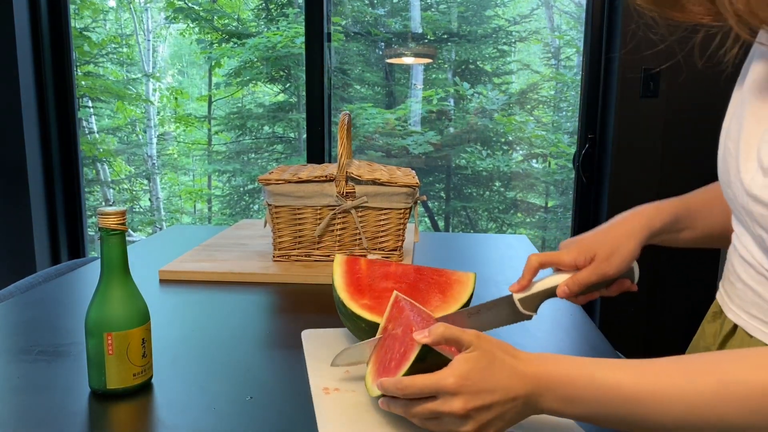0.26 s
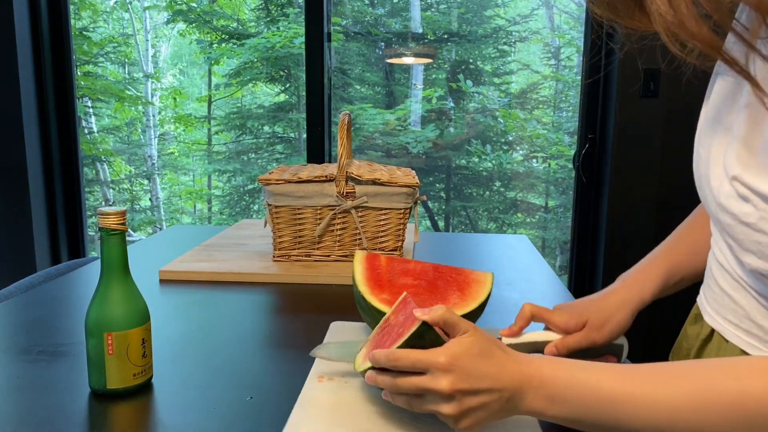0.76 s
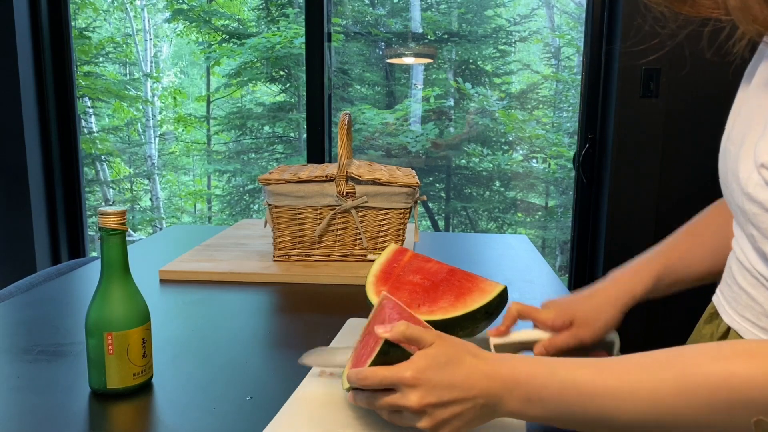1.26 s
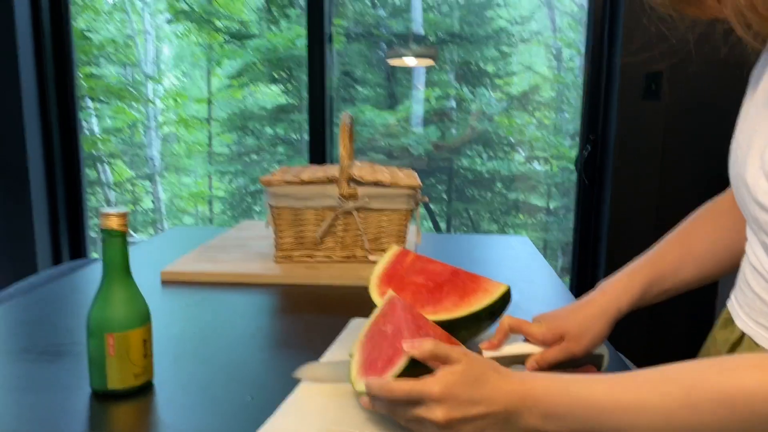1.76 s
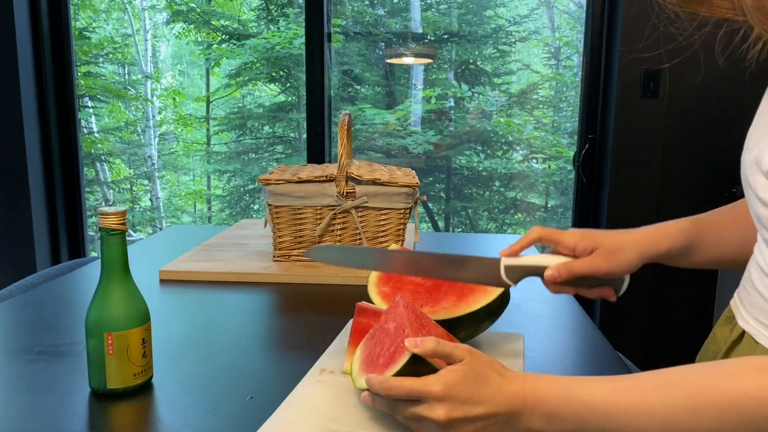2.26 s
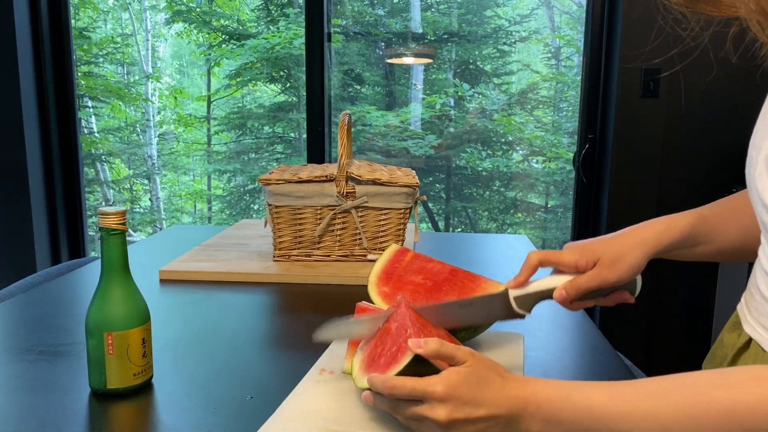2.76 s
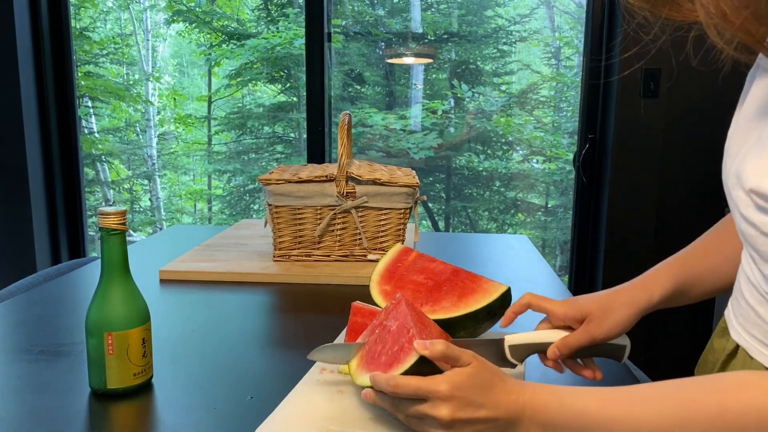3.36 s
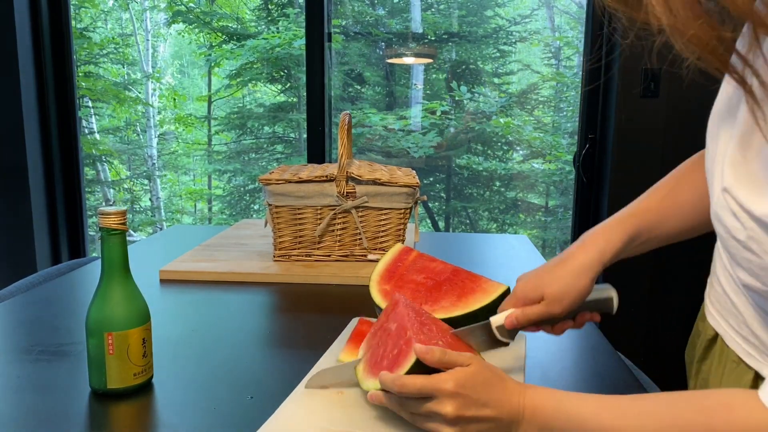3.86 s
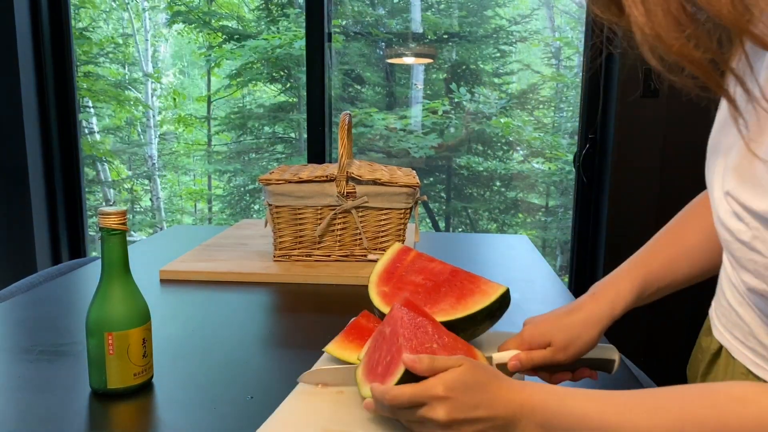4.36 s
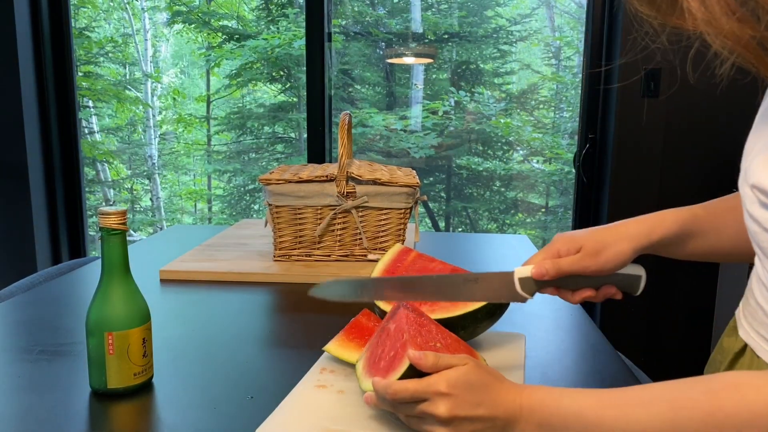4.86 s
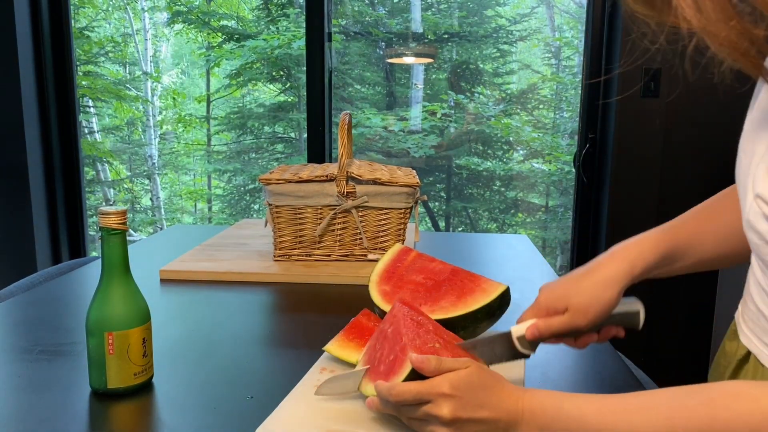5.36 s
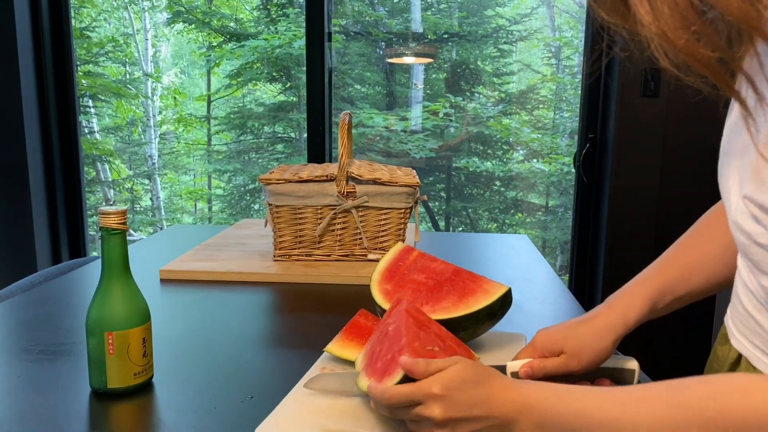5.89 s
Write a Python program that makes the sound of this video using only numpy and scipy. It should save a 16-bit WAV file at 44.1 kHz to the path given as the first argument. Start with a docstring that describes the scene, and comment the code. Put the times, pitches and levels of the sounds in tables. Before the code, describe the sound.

Close view of a large knife cutting watermelon on a plastic board. Short wet crunches with juicy fizz and low drag rumble come in bursts, a brief squeak of rind, then a hard clack and table boom. After a pause slower strokes follow, another heavy knock, more crunching and a final hollow tap. Bare, lively kitchen with faint ventilation hum.

```python
"""A large kitchen knife slices a watermelon on a plastic board on a table, in a bare cabin kitchen.
Strokes crunch as coloured crackle, with wet slips, fizz and a low drag rumble through the table.
Blade knocks ring the board's modes before the table top booms; the rocking melon thuds on the same modes.
Juice snaps are chirped clicks, the rind squeaks in one falling run of slips, and the cut wedge taps hollow.
Shaped noise and two wavering hum tones are the steady air; echoes and a scattered wash are the room."""
import sys
import numpy as np
from scipy import signal
from scipy.fft import rfft, irfft, next_fast_len
from scipy.io import wavfile
from scipy.ndimage import map_coordinates

SR = 44100
rng = np.random.default_rng(int(sys.argv[2]) if len(sys.argv) > 2 else 0)


def generate_wav(sig):
    """Save sig (samples, or channels by samples) to the path in sys.argv[1] as 16-bit PCM at SR."""
    pcm = np.round(np.clip(np.atleast_2d(sig).T, -1, 1) * 32767).astype(np.int16)
    wavfile.write(sys.argv[1], SR, pcm)


N = 270333
TOP_HZ = 15900  # upper band limit of the whole sound


def amp(db):
    """Decibels to linear gain."""
    return 10 ** (np.asarray(db) / 20)


def unit(x):
    """x at rms 1."""
    return x / np.sqrt(np.mean(x ** 2) + 1e-20)


def peak_one(x):
    """x at peak 1."""
    return x / np.abs(x).max()


def along(points, hz):
    """Read a curve of (f/Hz, value) points on a log frequency axis."""
    f, value = np.transpose(points)
    return np.interp(np.log(hz + 1), np.log(f), value)


def wobble(rate):
    """A smooth random curve, rate knots a second."""
    knots = rng.standard_normal(int(N * rate / SR) + 4)
    return map_coordinates(knots, [np.arange(N) * rate / SR])


def filtered(x, response):
    """x times a complex response of frequency."""
    size = next_fast_len(len(x) + 8192)
    return irfft(rfft(x, size) * response(np.fft.rfftfreq(size, 1 / SR)), size)[:len(x)]


def coloured(x, spectrum):
    """x with a spectrum laid on it, at rms 1."""
    return unit(filtered(x, lambda hz: amp(along(spectrum, hz))))


def add(track, s, sound):
    """Mix a sound into the track at time s."""
    start = max(round(s * SR), 0)
    track[start:start + len(sound)] += sound[:N - start]


def ring(modes, scatter_db):
    """Half a second of struck modes at slightly new strengths, peak 1; neighbours swing in opposite directions."""
    t = np.arange(SR // 2) / SR
    x = 0
    for k, (hz, db, t60) in enumerate(modes):
        level = db + scatter_db * rng.standard_normal() - 60 * t / t60
        x = x + (-1) ** k * amp(level) * np.sin(2 * np.pi * hz * t)
    return peak_one(x)


def bend(x, delay):
    """Bending waves travel as the root of frequency, so lows arrive late: a quick falling chirp."""
    def response(hz):
        # 100 Hz lags by about the delay, TOP_HZ not at all
        turns = np.sqrt(100 * hz) - hz * np.sqrt(100 / TOP_HZ) / 2
        return np.exp(-4j * np.pi * delay * turns)
    return filtered(x, response)


def click(spectrum, delay):
    """One sharp coloured impulse, drawn out into a chirp, peak 1."""
    impulse = signal.unit_impulse(SR // 2, SR // 1000)
    return peak_one(bend(coloured(impulse, spectrum), delay))


def chatter(spectrum, t60):
    """Dying coloured noise: a shower of tiny contacts, as when an edge settles along its length; peak 1."""
    t = np.arange(SR // 2) / SR
    decay = np.exp(-np.log(1000) * t / t60)
    return peak_one(coloured(rng.standard_normal(len(t)) * decay, spectrum))


def crackle(rate, spread_db):
    """Random tiny fractures, rate a second, mostly small and a few large."""
    size = amp(spread_db * np.minimum(rng.exponential(size=N), 5))
    return (rng.random(N) < rate / SR) * size * rng.choice([-1, 1], N)


def slip(hz, rise):
    """One slip of wet rind on steel: a swelling and dying burst of cycles, near peak 1."""
    t = np.arange(SR // 50) / SR
    return t / rise * np.exp(1 - t / rise) * np.sin(2 * np.pi * hz * t)


def squelch(rate, centre_hz, spread_db):
    """Small slips at scattered times, their pitch drifting with a random blade pressure; rms 1."""
    out, pressure = np.zeros(N), wobble(12)
    for n in np.flatnonzero(rng.random(N) < rate / SR):
        pitch, size = rng.standard_normal(2)
        hz = centre_hz * np.exp(.14 * pitch + 0.158 * pressure[n])
        add(out, n / SR, amp(spread_db * size) * slip(hz, rise=0.0007))
    return unit(out)


# modes of the table top: f/Hz, relative level/dB, t60/s
TABLE_MODES = [(77.5, -7.5, 0.42), (84.9, 1, 0.23), (130.6, -8, 0.12), (136.3, -5, 0.17), (155, -30, 0.021),
               (210.1, -6.5, 0.4), (232.5, -13, 0.21), (291, -10, 0.068)]


def boom(delay, centre_hz, rise, scatter_db):
    """Table-top modes crest after the delay, then ring out; the spot struck favours those near centre_hz."""
    t = np.arange(SR // 2) / SR - delay
    swell = np.exp(-(np.minimum(t, 0) / rise) ** 2) * np.clip((t + delay) / 0.002, 0, 1)
    x = 0
    for hz, db, t60 in TABLE_MODES:
        focus_db = -8.5 * abs(np.log2(hz / centre_hz))
        strength = amp(db + focus_db + scatter_db * rng.standard_normal())
        decay = np.exp(-np.log(1000) * np.maximum(t, 0) / t60)
        x = x + strength * swell * decay * np.cos(2 * np.pi * hz * t + np.pi / 4)
    return peak_one(x)


# pushes of the blade through the fruit: start t/s, time to full force t/s, easing-off time t/s,
# rind level at full force/dB before the layer trims, wet fizz level over the rind/dB before its trim
STROKES = [(0.0, 0.023, 0.07, -55, 0.5), (0.27, 0.02, 0.024, -47.5, -0.5),
           (0.565, 0.034, 0.027, -57.5, -2.5), (0.766, 0.048, 0.027, -48, 0.5),
           (1.31, 0.011, 0.077, -51.5, 1.5), (1.42, 0.027, 0.043, -48.5, 0.5), (1.48, .05, 0.028, -50, 1),
           (1.655, 0.018, .004, -43, 0.5), (2.54, 0.067, 0.045, -59.5, -1), (2.665, 0.09, .1, -54.5, -3.5),
           (2.815, .1, .025, -52.5, -3), (3.743, 0.0039, .15, -49, -2), (3.92, 0.13, 0.042, -47, -0.5),
           (4.113, 0.016, .004, -39, 2.5), (5.025, 0.02, 0.027, -62, 0), (5.126, 0.0056, 0.035, -48.5, -4),
           (5.18, 0.23, 0.0091, -47.5, -4), (5.44, 0.054, 0.051, -45, -3.5), (5.773, 0.057, 0.12, -47, 0),
           (5.895, 0.046, 0.024, -42, -1.5)]
# colours of the rind crunch and the wet fizz: f/Hz, relative level/dB
CRUNCH_COLOUR = [(150, -44), (400, 5), (900, 1.5), (1500, -1.5), (2800, 0), (4000, -3.5), (6000, -15),
                 (10000, -45)]
FIZZ_COLOUR = [(2000, -63), (4000, -7), (5500, 0), (8500, 0.5), (11000, -7), (13000, -11.5), (14700, -1.5),
               (16000, -1.5)]
ENTRY_DB, EXIT_DB = -8.5, -11.5  # force as a push starts and as it ends, against full force
CONTACT_S = 0.021  # fade-in before a push and fade-out after it


def slicing():
    """Cells burst, coarse in rind and fine in flesh; wet rind slips on the steel; the drag shakes the table."""
    t = np.arange(N) / SR
    rind, flesh = np.zeros(N), np.zeros(N)
    for start, push, ease, crunch_db, fizz_db in STROKES:
        end = start + push + ease
        contact = np.clip(1 + np.minimum(t - start, end - t) / CONTACT_S, 0, 1)
        push_db = np.interp(t, [start, start + push, end], [ENTRY_DB, 0, EXIT_DB])
        force = contact * amp(crunch_db + push_db)
        rind += force
        flesh += force * amp(fizz_db)
    grip = amp(2.44 * wobble(70))  # the blade advances in small jerks
    crunch = amp(-1.0) * rind * coloured(crackle(rate=2000, spread_db=1.5), CRUNCH_COLOUR)
    slips = amp(-8) * rind * squelch(rate=260, centre_hz=2732, spread_db=0.5)
    fizz = amp(-3.5) * flesh * coloured(crackle(rate=4800, spread_db=2.5), FIZZ_COLOUR)
    table = boom(delay=0.01173, centre_hz=86, rise=0.001, scatter_db=-12)
    rumble = unit(signal.fftconvolve(rng.standard_normal(N), table)[:N])
    drag = amp(-3.5) * rind * rumble
    return grip * (crunch + slips + fizz + drag)


# colour of the air noise: f/Hz, relative level/dB
AIR_COLOUR = [(15, -50), (25, -45), (48, -4.5), (84, -14), (120, -7), (149, -12), (195, -4.5), (269, -9),
              (334, -11), (372, -13.5), (693, -14), (1360, -28.5), (1990, -30.5), (2210, -30),
              (15900, -48.5)]
# appliance hum tones: f/Hz, mean rms level/dB
HUM_TONES = [(120, -62), (200, -62)]
AIR_DB = -52.5  # rms of the noise


def air():
    """Steady ventilation noise with a faint hum that wavers slightly in level and phase."""
    t = np.arange(N) / SR
    hum = 0
    for hz, db in HUM_TONES:
        level = amp(db + wobble(3.82)) * np.sqrt(2)
        hum = hum + level * np.sin(2 * np.pi * hz * t + .5 * wobble(4.4))
    return hum + amp(AIR_DB) * coloured(rng.standard_normal(N), AIR_COLOUR)


# the blade meets the board: t/s, edge crack level/dB, board clack level/dB, clack f/Hz,
# wooden body level/dB, table boom level/dB, boom f/Hz, boom delay t/s (levels before the layer trims)
KNOCKS = [(0.3073, -27, -20, 1340, -29.5, -23.5, 218, .018),
          (0.8736, -54, -38.5, 1440, -45.5, -54, 120, .015),
          (1.327, -47, -34.5, 1140, -37.5, -29.5, 110, .019), (1.651, -48, -59, 1200, -41, -41, 120, .015),
          (1.676, -23, -11, 1440, -21.5, -10, 124, .014), (3.750, -38, -31.5, 1030, -29.5, -29, 175, .018),
          (4.1314, -16.5, -14.5, 1080, -23.5, -14.5, 106, .022),
          (5.363, -26.5, -24, 1200, -26, -29.5, 340, .012), (5.598, -42, -40, 1420, -35, -31.5, 149, .018)]
# modes of the board with the blade on it: f/Hz, relative level/dB, t60/s
BOARD_MODES = [(748, -1, 0.082), (829, 6, .026), (928, -6, 0.043), (1095, -11.5, 0.096), (1201, 3, 0.024),
               (1340, -6, 0.047), (1486, 4.5, 0.021), (1580, -16, 0.086), (1884, -10.5, 0.045),
               (2323, -5, 0.052), (2610, -4, .02)]
# colours of the edge crack and the wooden body: f/Hz, relative level/dB
CRACK_COLOUR = [(500, 1), (1200, 10), (2000, 11), (2800, 11.5), (3800, 6.5), (5000, -3), (8500, -3.5),
                (12000, -17.5), (16000, -5)]
BODY_COLOUR = [(130, -24), (230, -9), (300, 9.5), (370, -1.5), (440, 7.5), (580, -12), (780, -2.5),
               (1100, -4.5), (2000, -39)]
FOCUS_DB_PER_OCT = 11  # the spot struck favours board modes near the clack's pitch


def knocks():
    """The edge cracks on the board, the board clacks in its modes, and the table booms a moment later."""
    out = np.zeros(N)
    for s, crack_db, clack_db, clack_hz, body_db, boom_db, boom_hz, delay in KNOCKS:
        board = []
        for hz, db, t60 in BOARD_MODES:
            board.append((hz, db - FOCUS_DB_PER_OCT * abs(np.log2(hz / clack_hz)), t60))
        add(out, s, amp(crack_db - 12.0) * click(CRACK_COLOUR, delay * .5))
        add(out, s, amp(crack_db - 2) * chatter(CRACK_COLOUR, t60=0.097))
        add(out, s, amp(clack_db - 0.5) * bend(ring(board, scatter_db=1), delay * 0.602))
        add(out, s, amp(body_db) * click(BODY_COLOUR, delay * 1.1))
        add(out, s, amp(boom_db + 1.0) * boom(delay, boom_hz, rise=0.0088, scatter_db=1.5))
    return out


# the melon rocks or gives way under the blade: t/s, level/dB before the trim, boom f/Hz
THUDS = [(0.335, -25, 75), (0.827, -24.5, 168), (1.539, -35, 110), (3.822, -21.5, 132), (3.845, -21.5, 131),
         (4.014, -30, 120), (5.494, -34.5, 80), (5.514, -30.5, 80), (5.947, -32, 70)]


def melon_thuds():
    """Soft heavy fruit only moves the table's low modes."""
    out = np.zeros(N)
    for s, db, boom_hz in THUDS:
        add(out, s, amp(db - 0.5) * boom(0.01097, boom_hz, rise=0.01, scatter_db=5.5))
    return out


# wet snaps of flesh and juice: t/s, level/dB before the tick and spatter trims,
# lower part's level against that/dB
SNAPS = [(1.1113, -37.5, -9.5), (1.6681, -23.5, -3.5), (2.661, -45, -20), (3.4762, -35, -24),
         (4.8379, -49.5, -25), (5.3428, -34.5, -1), (5.476, -31.5, -6.5), (5.5914, -41, -4),
         (5.9596, -33, -5)]


def snaps():
    """Single fibres and films of juice break with a bright tick and a little spatter over a lower click."""
    out = np.zeros(N)
    for s, db, low_db in SNAPS:
        add(out, s, amp(db - 3.5) * click(FIZZ_COLOUR, delay=0.02))
        add(out, s, amp(db - 5.5) * chatter(FIZZ_COLOUR, t60=0.018))
        add(out, s, amp(db + low_db) * click(CRUNCH_COLOUR, delay=.012))
    return out


SQUEAK_START_S, SQUEAK_HZ, SQUEAK_SAG_HZ_PER_S = 1.388, 3600, 6900
FIRST_GAP_S, LAST_GAP_S = 0.026, .010  # first wait between slips, and the wait they close in on
GAP_SHRINK = 0.3  # share of the extra wait left after each slip
SQUEAK_DB = -34  # slip level at the crest
SQUEAK_CREST_S, SQUEAK_FADE_DB_PER_S = .036, 210  # crest delay, and the fall on either side of it


def squeaks(count=9):
    """Rind sticks and slips on the steel in one run that swells and fades, quickens and falls in pitch."""
    out, age = np.zeros(N), 0
    for k in range(count):
        s = SQUEAK_START_S + age
        db = SQUEAK_DB - SQUEAK_FADE_DB_PER_S * abs(age - SQUEAK_CREST_S)
        hz = SQUEAK_HZ - SQUEAK_SAG_HZ_PER_S * age
        add(out, s, amp(db) * slip(hz, rise=0.00073))
        add(out, s, amp(db - 7.5) * click(CRACK_COLOUR, delay=0.013))
        age += LAST_GAP_S + (FIRST_GAP_S - LAST_GAP_S) * GAP_SHRINK ** k
    return out


# the cut wedge taps down on the board and rocks once: t/s, level/dB before the layer trims
TAPS = [(6.062, -27.5), (6.103, -35.5)]
# modes of the wedge: f/Hz, relative level/dB, t60/s
WEDGE_MODES = [(319, -10, 0.078), (463, -9.5, 0.073), (615, -5, 0.061), (763, -6, 0.025), (1820, -18, 0.02)]


def wedge_taps():
    """The loose wedge rings its own modes: a hollow tap with a faint click of contact."""
    out = np.zeros(N)
    for s, db in TAPS:
        add(out, s, amp(db - 3) * ring(WEDGE_MODES, scatter_db=4))
        add(out, s, amp(db - 22) * click(CRUNCH_COLOUR, delay=.006))
    return out


# reverberation time: f/Hz, t60/s
ROOM_T60 = [(80, 0.55), (250, 0.5), (1500, 0.54), (4000, 0.55), (8000, 0.48), (15000, 0.27)]
# tail over the direct sound: f/Hz, level/dB
ROOM_WET = [(30, -5), (70, -10.5), (150, -5.5), (400, 0), (800, -3.5), (1500, -2), (3000, -1), (5000, 2),
            (15000, 1.5)]
# room energy that flat walls return unscattered: f/Hz, share
MIRRORED = [(200, 0.89), (2300, 0.55), (3500, 0.3), (15000, 0.21)]


def room(x):
    """Flat walls return true echoes, clutter scatters the rest into a wash; each band dies at its own speed."""
    frames = dict(nperseg=512, noverlap=384)
    hz, age, z = signal.stft(x, SR, **frames)
    decay = np.exp(-np.log(1e6) * age / along(ROOM_T60, hz)[:, None])
    fade = decay * np.clip(age / .006, 0, 1)  # energy builds over the first 6 ms
    fade = fade / fade.sum(axis=1, keepdims=True)
    tail_noise, wash_noise = signal.stft(rng.standard_normal((2, N)), SR, **frames)[2]

    # echoes: a noise tail with energy 1 in every band
    tail = signal.istft(tail_noise * np.sqrt(fade / (age[1] * SR)), SR, **frames)[1][:SR]
    echoes = signal.fftconvolve(x, tail)[:N]

    # wash: fresh noise that follows only the energy of each band
    energy = signal.fftconvolve(abs(z) ** 2, fade, axes=1)[:, :len(age)]
    wash_gain = np.sqrt(abs(energy) / np.mean(abs(wash_noise) ** 2))
    wash = signal.istft(wash_noise * wash_gain, SR, **frames)[1][:N]

    def share(f):
        return np.clip(along(MIRRORED, f), 0, 1)

    mirrored = filtered(echoes, lambda f: np.sqrt(share(f)))
    scattered = filtered(wash, lambda f: np.sqrt(1 - share(f)))
    return filtered(mirrored + scattered, lambda f: amp(along(ROOM_WET, f)))


def scene():
    """All the knife work, dry plus its room sound, over the steady air."""
    work = slicing() + knocks() + melon_thuds() + snaps() + squeaks() + wedge_taps()
    return (work + room(work) + air())[None]


def record(dry):
    """Cut everything from TOP_HZ up."""
    return filtered(dry[0], lambda hz: hz < TOP_HZ)[None]


dry = scene()
out = record(dry)
generate_wav(out)
```